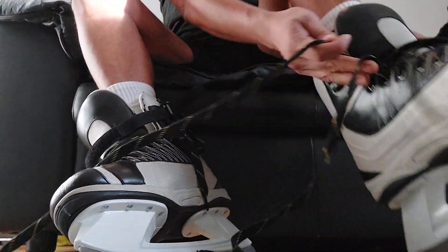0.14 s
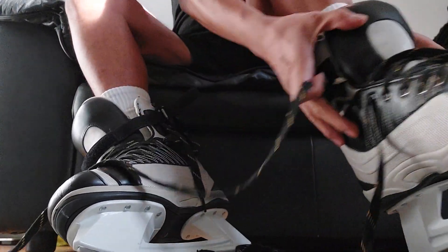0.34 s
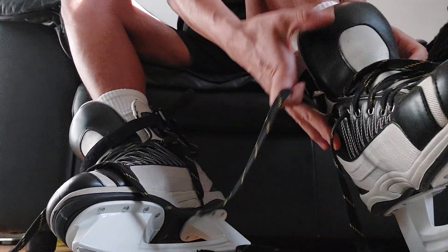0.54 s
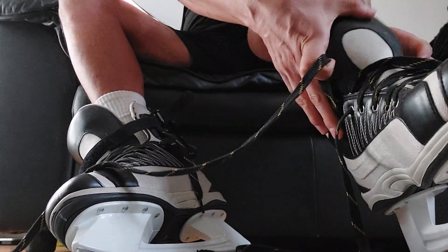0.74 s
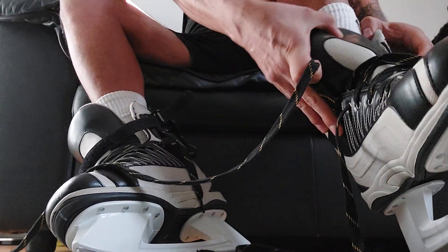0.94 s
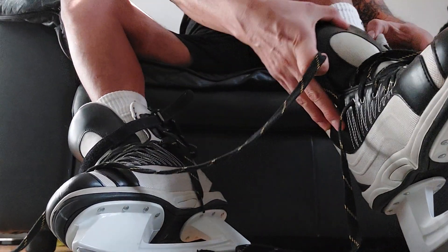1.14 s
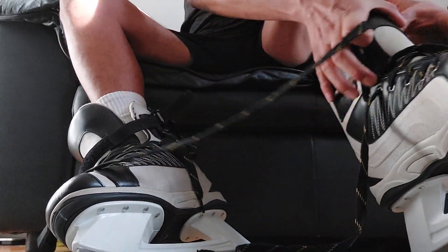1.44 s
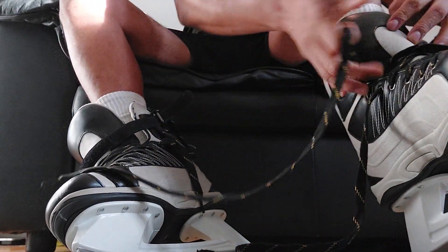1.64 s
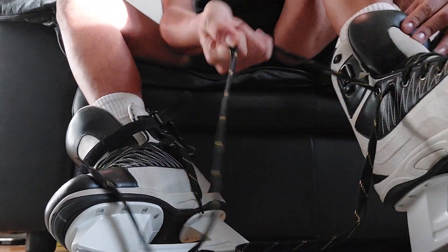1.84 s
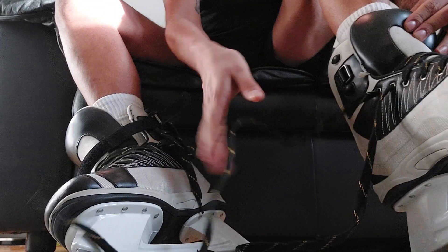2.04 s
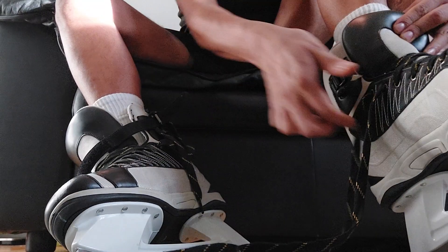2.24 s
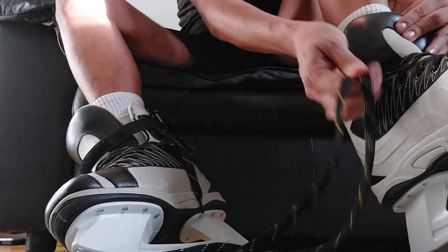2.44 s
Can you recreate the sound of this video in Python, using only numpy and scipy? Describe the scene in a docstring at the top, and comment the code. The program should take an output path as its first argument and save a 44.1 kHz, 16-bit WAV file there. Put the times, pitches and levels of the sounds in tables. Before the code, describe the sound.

Lacing up a stiff skate boot: soft heavy knock, dull taps, creaking and buzzing lace pulls

```python
"""A quiet room, a small stereo microphone close to a stiff new skate boot whose lace is hauled tight.
The skate knocks on the floor: a sagging thud, ringing floorboard modes and chattering metal modes.
The boot creaks in short ringing grains and taps in falling sines; bright ticks are dying bands of noise.
The woven lace rasps over an eyelet, one bump per rib, and hisses as it slides: coloured, flickering noise.
Behind it lie a steady room tone, a short dull room tail and a faint, brief whine of resonant noise."""
import sys
import numpy as np
from scipy import signal
from scipy.fft import rfft, irfft
from scipy.io import wavfile

SR = 44100
rng = np.random.default_rng(int(sys.argv[2]) if len(sys.argv) > 2 else 0)


def master(y):
    """Save y as 16-bit WAV."""
    cut = np.clip(np.atleast_2d(y).T, -1, 1)
    pcm = np.round(cut * 32767)  # scale
    wavfile.write(sys.argv[1], SR, pcm.astype(np.int16))


def gain_from_db(level_db):
    """Turn a decibel level (scalar or array-like) into a linear amplitude factor."""
    decades = np.asarray(level_db, float) / 20
    return 10 ** decades


N = 114660

# Steady noise of the room. Each row: frequency in Hz, relative density in dB per Hz.
ROOM_TONE = [(25, -6), (60, -6), (130, 5.5), (300, -4.5), (600, -12.5), (1100, -13), (1400, -19),
             (2000, -25.5), (3000, -28.5), (6000, -27.5), (9000, -32.5), (15800, -43)]
ROOM_TONE_DB = -70
# The dull tail of the room: time to fall 60 dB, level against the direct sound
ROOM_T60_S, ROOM_DB = 0.26, -17

# A faint whine. Each row: frequency in Hz, width in Hz, level in dB.
WHINE = [(1300, 48, -79), (3170, 130, -87)]
WHINE_START_S, WHINE_END_S = 2.12, 2.25

# Modes of the floorboard. Each row: frequency in Hz, relative level in dB, time to fall 60 dB in seconds.
FLOORBOARD = [(88, -27, .2), (136.8, -15, 0.64), (208, -32, 0.3), (312, -45, 0.172)]
# The skate is set down
KNOCK_S, KNOCK_DB, KNOCK_RISE_S = .247, -13, 0.0032
KNOCK_START_HZ, KNOCK_END_HZ, KNOCK_GLIDE_S = 161, 90, 0.014
RING_BUILD_S = .018
KNOCK_DAMPED_S, KNOCK_DAMPING_DB = .327, -12.5   # the skate settles and part of the ring is stopped

# A small metal part chattering around the knock. Each row: time in seconds, level in dB.
CHATTER = [(0.16, -89), (0.186, -79), (0.236, -88), (0.25, -70), (0.268, -62.5), (0.318, -79), (0.334, -72),
           (0.354, -89), (0.37, -87)]
# Modes of that part. Each row: frequency in Hz, relative level in dB, time to fall 60 dB in seconds.
METAL = [(5490, -4, 0.034), (5650, -10, .012), (11800, -6, 0.017)]
CHATTER_PER_S = 520

# Pressure of hands and lace on the boot. Each row: time in seconds, level of the creaks in dB,
# pitch they centre on in Hz, floor hum relative to the creaks in dB.
HANDLING = [(0.0, -50, 297, -7), (0.1, -73, 268, -20), (0.17, -66.5, 310, -10), (0.2, -63.5, 216, 1),
            (0.32, -56, 240, -11), (0.36, -57, 288, -11), (0.49, -69, 334, -10), (0.52, -66, 530, -6),
            (0.54, -55, 496, -36), (0.57, -58, 298, -5), (0.61, -66.5, 275, 13), (0.66, -57, 422, -4),
            (0.74, -60.5, 287, -9), (0.77, -55, 355, -23), (0.88, -52, 433, -22), (0.95, -45, 317, -19),
            (1.08, -57, 503, -17), (1.12, -71, 477, -8), (1.19, -73, 291, -4), (1.22, -73, 370, -10),
            (1.26, -59.5, 315, -8), (1.34, -57, 457, -16), (1.38, -54.5, 296, -17), (1.41, -63.5, 282, -20),
            (1.48, -60, 423, -18), (1.52, -54, 302, -35), (1.64, -61, 286, 10.5), (1.81, -69.5, 567, -4),
            (1.83, -53.5, 600, -5), (1.93, -57, 344, -3), (2.01, -66.5, 275, -2), (2.05, -84, 369, 0),
            (2.13, -88, 240, -3), (2.25, -77, 417, -6), (2.32, -80, 306, -1), (2.34, -70.5, 460, -27),
            (2.41, -66, 820, -29), (2.46, -75.5, 810, -21), (2.56, -64.5, 365, -16), (2.6, -55, 386, -29)]
# Colour of the boot's rustle. Each row: frequency in Hz, relative density in dB per Hz.
LEATHER = [(24, -21), (40, -7), (86, -43), (124, 6.5), (168, -9), (214, 9), (384, -1), (443, 6.5),
           (935, -4), (1780, -18), (5000, -28), (6500, -47), (11000, -120)]
CREAKS_PER_S, CREAK_SPREAD_DB, RUSTLE_DB = 350, 1, -1   # rustle relative to the creaks
CREAK_CYCLES = 5.5   # cycles in which a grain falls 60 dB

# Dull taps and single creaks. Each row: time of the touch in seconds, peak level in dB,
# pitch settled on in Hz, rough edge relative to the thump in dB.
TAPS = [(0.189, -44.5, 376, -25), (0.246, -40, 202, -14), (0.258, -29, 215, -16), (0.264, -39, 204, -12),
        (0.281, -35, 214, -8.5), (0.329, -65, 229, 3), (0.331, -34.5, 202, -5.5), (0.354, -39, 273, -20),
        (0.394, -41.5, 226, -10.5), (0.534, -40, 490, -19), (0.588, -33.5, 223, -14), (0.67, -50, 486, -34),
        (0.682, -33.5, 215, -22), (0.709, -35, 214, -14), (0.742, -42.5, 239, -34),
        (0.876, -34.5, 538, -13.5), (0.894, -36, 750, -21), (0.902, -26.5, 470, -13.5),
        (0.917, -27, 465, -13), (0.926, -25, 312, -12), (0.929, -29, 190, -22), (0.94, -29.5, 263, -10),
        (0.956, -40, 207, -2), (0.957, -27, 486, -43), (0.964, -33.5, 204, -36), (0.975, -35.5, 480, -16),
        (1.044, -38.5, 456, -4), (1.058, -31.5, 430, -11.5), (1.073, -28.5, 478, -23),
        (1.227, -51.5, 440, -4), (1.25, -51.5, 198, -2), (1.389, -44.5, 222, -28), (1.479, -48, 229, -6),
        (1.528, -38, 237, -6), (1.544, -34, 233, -34), (1.642, -40.5, 272, -19), (1.653, -37, 248, -20),
        (1.67, -39, 480, -17), (1.711, -37.5, 406, -31), (1.961, -28.5, 268, -17), (1.976, -42.5, 235, -11),
        (2.041, -44.5, 410.4, -25), (2.057, -47.5, 265, -15), (2.253, -44, 365, -12.5),
        (2.35, -55.5, 511, 4), (2.383, -46, 476, -12), (2.427, -39.5, 600, -24), (2.432, -43, 960, -18),
        (2.434, -32.5, 683, -10), (2.524, -50, 620, -24)]
TAP_DELAY_S = 0.001528   # each tap sounds this long after its listed time
TAP_CYCLES = 2.78   # cycles in which the thump falls 30 dB
TAP_DROP = 0.92   # extra pitch at the start, as a part of the settled pitch
TAP_EDGE_T60_S = 0.016
# Pass band of the rough edge: lower and upper limit in Hz.
EDGE_BAND_HZ = [450, 1900]

# Bright ticks of lace tip and fibres. Each row: start in seconds, peak level in dB, band centre in Hz.
TICKS = [(0.093, -49.5, 13700), (0.2608, -74, 3000), (0.2838, -59, 3290), (0.2914, -60, 5410),
         (0.5454, -54, 14300), (0.587, -51, 14000), (0.792, -58, 9780), (0.9177, -50.5, 5830),
         (1.3773, -57, 5140), (1.5431, -47.5, 6300), (1.656, -57, 4400), (1.6702, -54.5, 3250),
         (2.0398, -57, 13300), (2.3363, -56, 4500), (2.4263, -54, 12500), (2.4354, -49, 4940)]
TICK_T60_S, TICK_WIDTH = .008, .45   # half width of the band as a part of its centre

# Lace and skin sliding. Each row: time in seconds, level below the split in dB,
# level above the split relative to that in dB.
SLIDE = [(0.0, -59, -32), (0.09, -74, -29), (0.09, -70, 6), (0.23, -78.5, -13), (0.28, -66.5, 3.5),
         (0.36, -76.5, 0), (0.53, -84.5, 8.5), (0.56, -67.5, -6), (0.69, -71, 7.5), (0.75, -77, 0),
         (0.91, -67.5, -12), (0.93, -60.5, -3), (1.07, -67, -18), (1.19, -91.5, 7), (1.3, -72.5, -6),
         (1.44, -76, 0), (1.53, -75, -10), (1.54, -63, -10), (1.63, -68.5, -31), (1.72, -78.5, 1.5),
         (1.81, -58, -4.5), (1.9, -59, -2), (1.94, -69, -14), (2.06, -77.5, 0.5), (2.14, -98, 11),
         (2.34, -79.5, -14.5), (2.43, -66, 10.5), (2.45, -69.5, -18), (2.49, -76, -1), (2.6, -77, 18.5)]
# Colour of the slide hiss. Each row: frequency in Hz, relative density in dB per Hz.
SLIDE_TONE = [(900, -5.5), (1800, -8.5), (2600, -16), (3300, -21), (5000, -13), (6500, -15.5), (8600, -25),
              (11500, -11), (14000, -8.5), (15800, -6.5)]
SPLIT_HZ, SLIDE_PATCHY_DB = 8800, 1

# Weave of the lace running over an eyelet, one list per pull.
# Each row: time in seconds, level in dB, ribs per second.
RASPS = [
    [(.655, -60, 437), (.675, -35, 460), (.69, -48, 570), (.705, -51.5, 490), (.735, -68, 400)],
    [(1.775, -79, 480), (1.79, -42.5, 500), (1.815, -43.5, 598), (1.835, -36.5, 690), (1.855, -39, 623),
     (1.875, -35, 418), (1.9, -48, 360), (1.93, -58.5, 170)],
]
RASP_JITTER, RASP_WAVER_DB = .07, 3.5   # spread of the rib rate as a part of it, spread of the level
RASP_HALF_DB, RASP_OVERTONE_DB = -8, -18
RASP_FUZZ_DB, RASP_FUZZ_HZ = -2.5, 148   # rough part around the rib rate

# Likeness of the two microphone ports. Each row: frequency in Hz, left-right likeness (0 to 1).
LIKENESS = [(60, 0.42), (130, 0.44), (290, 0.82), (640, 0.62), (1410, 0.34), (3100, 0.3), (6820, 0.029),
            (15000, 0.041)]
# Difference in colour of the ports. Each row: frequency in Hz, left minus right in dB.
TILT = [(60, 1), (130, 1), (250, .5), (1200, .4), (2400, 6), (4400, 12), (6500, 3), (8500, -4), (12000, 2)]
LEFT_LAG_S, LOW_CUT_HZ, HIGH_CUT_HZ = .00007, 60, 15800
FLOOR_SIDE_DB, FLOOR_SIDE_LAG_S = -11.5, 0.0019   # the floorboard reaches the ports out of step


def white():
    """White noise of rms 1 over the whole scene."""
    return rng.standard_normal(N)


def rms_one(x):
    """Scale to rms 1."""
    return x / np.sqrt(np.mean(x ** 2) + 1e-20)


def in_time(rows):
    """Columns of a table after the time column, one value a sample."""
    s, *columns = np.transpose(rows)
    return [np.interp(np.arange(N) / SR, s, c) for c in columns]


def at_hz(points):
    """A spectrum table on the FFT grid, interpolated over log frequency."""
    hz, value = np.transpose(points)
    return np.interp(np.log(np.arange(N // 2 + 1) * SR / N + 1), np.log(hz), value)


def colour(x, points):
    """Give white input a spectrum; rms 1."""
    return rms_one(irfft(rfft(x) * gain_from_db(at_hz(points)), N))


def split_filter(x, order, hz, kind):
    """Butterworth filter: low, high or band pass."""
    return signal.sosfilt(signal.butter(order, hz, kind, fs=SR, output="sos"), x)


def drift(rate):
    """Random wander of rms 1: noise through two equal low-pass poles at rate (Hz)."""
    r = np.exp(-2 * np.pi * rate / SR)
    settled = signal.lfilter([1], [1, -2 * r, r * r], rng.standard_normal(N + SR))[SR:]
    return rms_one(settled)


def ring(clicks, hz, t60):
    """A two-pole resonator: a unit click sets a dying sine ringing, of height 1 before decay."""
    r, w = gain_from_db(-60 / (t60 * SR)), 2 * np.pi * hz / SR
    return signal.lfilter([0, np.sin(w)], [1, -2 * r * np.cos(w), r * r], clicks + 1e-18)


def body(x, modes):
    """Sum of the ringing modes of a body."""
    return sum(gain_from_db(db) * ring(x, hz, t60) for hz, db, t60 in modes)


def place(rows, shapes):
    """Lay sounds at their times and peak levels."""
    out = np.zeros(N + SR)
    for (s, db, *_), shape in zip(rows, shapes):
        start = int(s * SR)
        out[start:start + len(shape)] += gain_from_db(db) * shape / np.abs(shape).max()
    return out[:N]


def room_tone():
    """Steady coloured noise of the quiet room."""
    return gain_from_db(ROOM_TONE_DB) * colour(white(), ROOM_TONE)


def room(x):
    """A dull dying tail: low-passed noise that starts 6 ms after the direct sound."""
    t = np.arange(int(.4 * SR)) / SR
    dull = signal.lfilter([.3], [1, -.7], rng.standard_normal(len(t)))
    tail = dull * gain_from_db(-60 * t / ROOM_T60_S) * (t > .006)
    return signal.fftconvolve(x, tail / np.sqrt(np.sum(tail ** 2)))[:N]


def whine():
    """Noise in two narrow resonances for a moment."""
    gate, = in_time([(WHINE_START_S - .03, 0), (WHINE_START_S + 0.036, 1),
                     (WHINE_END_S - .02, 1), (WHINE_END_S + .01, 0)])
    tones = 0
    for hz, width, db in WHINE:
        t60 = np.log(1000) / np.pi / width
        tones = tones + gain_from_db(db) * rms_one(ring(white(), hz, t60))
    return gate * tones


def knock():
    """A soft heavy thud that sags in pitch and leaves the floorboard ringing."""
    t = np.maximum(np.arange(N) / SR - KNOCK_S, 0)
    sag_turns = (KNOCK_START_HZ - KNOCK_END_HZ) * KNOCK_GLIDE_S * (1 - np.exp(-t / KNOCK_GLIDE_S))
    turns = KNOCK_END_HZ * t + sag_turns
    push = (t / KNOCK_RISE_S) ** 2 * np.exp(-t / KNOCK_RISE_S)
    thud = push / push.max() * np.sin(2 * np.pi * turns)
    rung = sum(gain_from_db(db - 60 * t / t60) * np.sin(2 * np.pi * hz * t) for hz, db, t60 in FLOORBOARD)
    build = 1 - np.exp(-(t / RING_BUILD_S) ** 2)
    # the damping sets in over 1.7 ms
    damped = gain_from_db(KNOCK_DAMPING_DB * np.clip((t + KNOCK_S - KNOCK_DAMPED_S) / 0.0017, 0, 1))
    return gain_from_db(KNOCK_DB) * (thud + damped * rung * build)


def chatter():
    """Tiny quick random touches set a few metal modes ringing."""
    db, = in_time([(0, -140), *CHATTER, (CHATTER[-1][0] + .02, -140)])
    touches = (rng.random(N) < CHATTER_PER_S / SR) * white()
    return gain_from_db(db) * rms_one(body(touches, METAL))


def handling():
    """Uneven ringing creak grains around the pitch of the moment, rustle, and the floorboard humming along."""
    db, hz, hum_db = in_time(HANDLING)
    sizes = gain_from_db(CREAK_SPREAD_DB * np.minimum(rng.exponential(1, N), 4)) * rng.choice([-1, 1], N)
    born = sizes * (rng.random(N) < CREAKS_PER_S / SR)
    # each grain is dealt one of 14 pitches, scattered around the centre
    pitches = np.geomspace(90, 2400, 14)
    centre = np.interp(np.log(hz), np.log(pitches), np.arange(14))
    dealt = np.clip(np.round(centre + 1.9 * white()), 0, 13)
    grains = 0
    for k, pitch in enumerate(pitches):
        rung = ring(born * (dealt == k), pitch, CREAK_CYCLES / pitch)
        grains = grains + rung * (450 / pitch) ** 0.19   # higher grains are weaker
    rustle = colour(white(), LEATHER) * gain_from_db(4 * drift(30))
    hum = rms_one(body(white(), FLOORBOARD))
    return gain_from_db(db) * (rms_one(grains) + gain_from_db(RUSTLE_DB) * rustle + gain_from_db(hum_db) * hum)


def taps():
    """Dull blows: a few cycles that fall in pitch, with a rough edge of dying noise."""
    t = np.arange(2000) / SR
    noise = rng.standard_normal((len(TAPS), 2000)) * gain_from_db(-60 * t / TAP_EDGE_T60_S)
    edges = split_filter(noise, 3, EDGE_BAND_HZ, "band")
    shapes = []
    for (_, _, hz, edge_db), edge in zip(TAPS, edges):
        turns = hz * t * (1 + TAP_DROP * np.exp(-hz * t))
        decay = gain_from_db(-60 * hz * t / (2 * TAP_CYCLES))
        onset = 1 - np.exp(-(3.67 * hz * t) ** 2)
        thump = np.sin(2 * np.pi * turns) * decay * onset
        shapes.append(thump / np.abs(thump).max() + gain_from_db(edge_db) * edge / np.abs(edge).max())
    return np.roll(place(TAPS, shapes), int(TAP_DELAY_S * SR))


def ticks():
    """Short dying noise, band-passed around each tick's centre."""
    t = np.arange(1500) / SR
    shapes = []
    for _, _, hz in TICKS:
        noise = rng.standard_normal(1500) * gain_from_db(-60 * t / TICK_T60_S)
        band = [hz * (1 - TICK_WIDTH), min(hz * (1 + TICK_WIDTH), 19000)]
        shapes.append(split_filter(noise, 1, band, "band"))
    return place(TICKS, shapes)


def slide():
    """Fine friction hiss, lower and upper part each flickering."""
    db, top_db = in_time(SLIDE)
    hiss = colour(white(), SLIDE_TONE)
    low = rms_one(split_filter(hiss, 4, SPLIT_HZ, "low"))
    high = rms_one(split_filter(hiss, 4, SPLIT_HZ, "high"))
    low_flicker = gain_from_db(SLIDE_PATCHY_DB * drift(28))
    high_flicker = gain_from_db(SLIDE_PATCHY_DB * drift(35))
    return gain_from_db(db) * (low * low_flicker + gain_from_db(top_db) * high * high_flicker)


def rasp():
    """One bump per rib of the weave, unsteady, with strong-weak pairs and overtones."""
    # multiples of the rib rate and their levels in dB
    partials = [(1, 0), (1 / 2, RASP_HALF_DB), (2, RASP_OVERTONE_DB), (3, 4.0 * RASP_OVERTONE_DB)]
    out = 0
    for rows in RASPS:
        first, last = rows[0], rows[-1]
        db, rate = in_time([(first[0] - .01, -140, first[2]), *rows, (last[0] + 0.0088, -140, last[2])])
        turn = 2 * np.pi * np.cumsum(rate * (1 + RASP_JITTER * drift(156))) / SR
        wave = sum(gain_from_db(d + RASP_WAVER_DB * drift(75)) * np.sin(k * turn) for k, d in partials)
        fuzz = gain_from_db(RASP_FUZZ_DB) * drift(RASP_FUZZ_HZ) * np.cos(turn)
        out = out + gain_from_db(db) * (wave + fuzz)
    return out


def scene():
    """Blows reach both ports alike; noisy sounds and the room add an unrelated part that sets the ports apart."""
    thud = knock()
    near_blows = taps() + rasp()
    parts = []
    for direct in (near_blows + thud, 0):   # the common part, then the unrelated part
        noisy = handling() + chatter() + ticks() + slide() + whine()
        tail = gain_from_db(ROOM_DB) * room(near_blows + noisy)   # the thud is left out of the tail
        parts.append(rfft(direct + noisy + tail + room_tone()))
    middle, apart = parts
    alike = np.clip(at_hz(LIKENESS), 0, 1)
    floor_side = gain_from_db(FLOOR_SIDE_DB) * rfft(np.roll(thud, int(FLOOR_SIDE_LAG_S * SR)))
    side = apart * np.sqrt((1 - alike) / (1 + alike)) + floor_side
    return irfft([middle + side, middle - side], N)


def roll_off(x):
    """The treble ends steeply here."""
    return signal.sosfilt(signal.butter(12, 16340, fs=SR, output="sos"), x)


def record(dry):
    """The microphone's ports differ in colour and arrival; bass and top are cut."""
    hz = np.arange(N // 2 + 1) * SR / N
    tilt = gain_from_db(at_hz(TILT) / 2)
    lag = np.exp(-2j * np.pi * hz * LEFT_LAG_S)
    balance = np.sqrt((tilt ** 2 + tilt ** -2) / 2)   # keeps the mean power of the two ports
    ports = irfft(rfft(dry) * [tilt * lag, 1 / tilt] / balance, N)
    ports = split_filter(ports, 4, LOW_CUT_HZ, "high")
    mix = irfft(rfft(ports) * (hz < HIGH_CUT_HZ), N)
    return roll_off(mix)


dry = scene()
out = record(dry)
master(out)
```